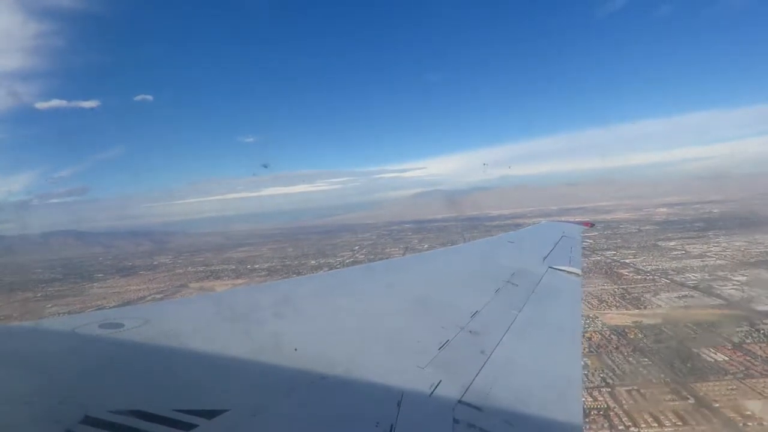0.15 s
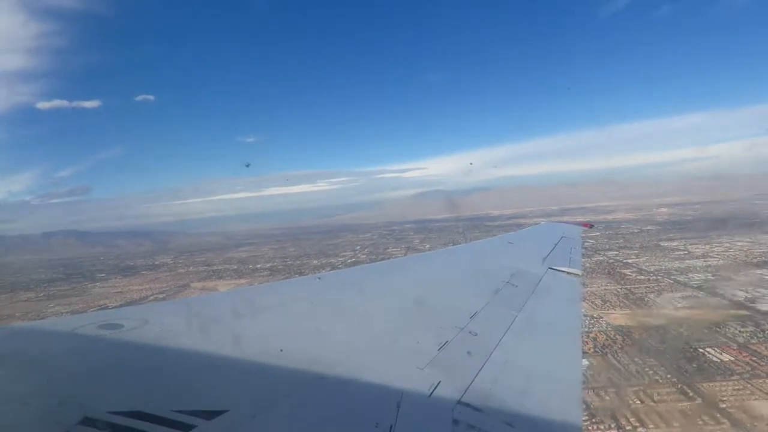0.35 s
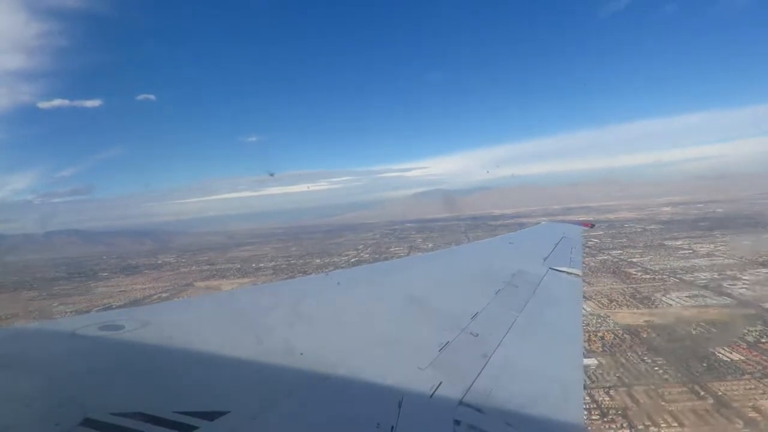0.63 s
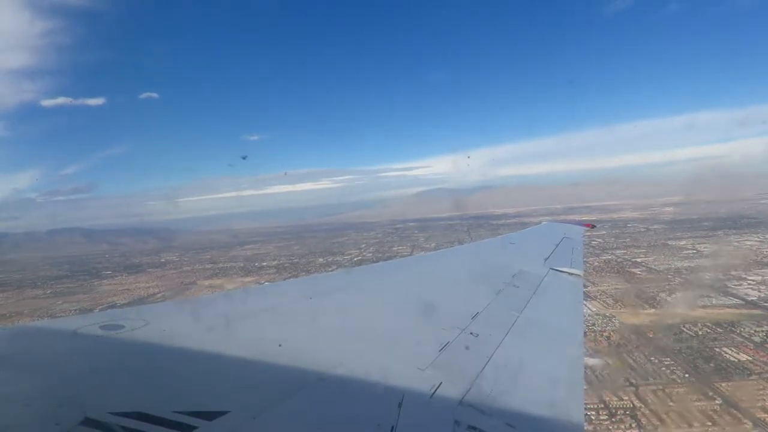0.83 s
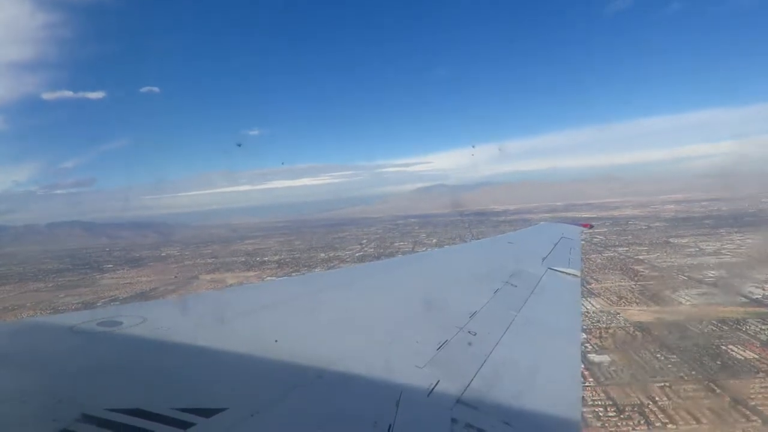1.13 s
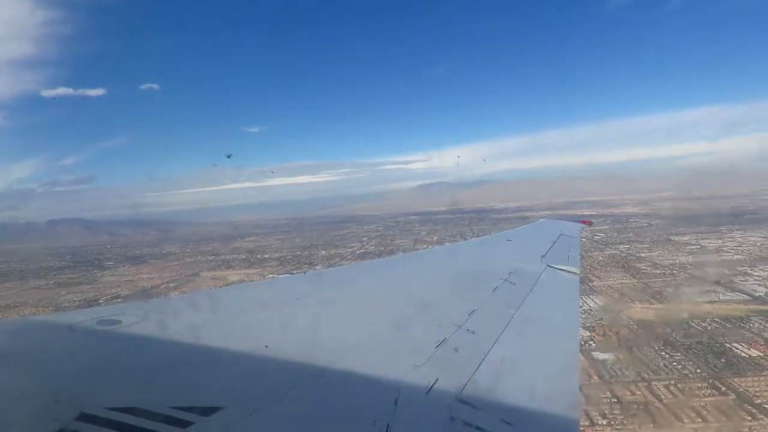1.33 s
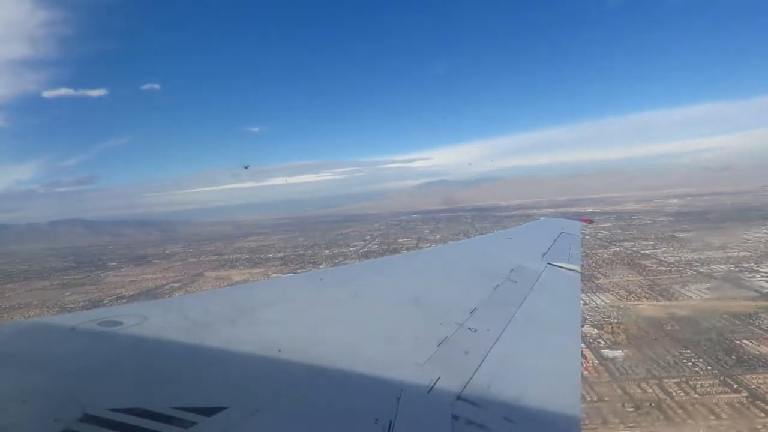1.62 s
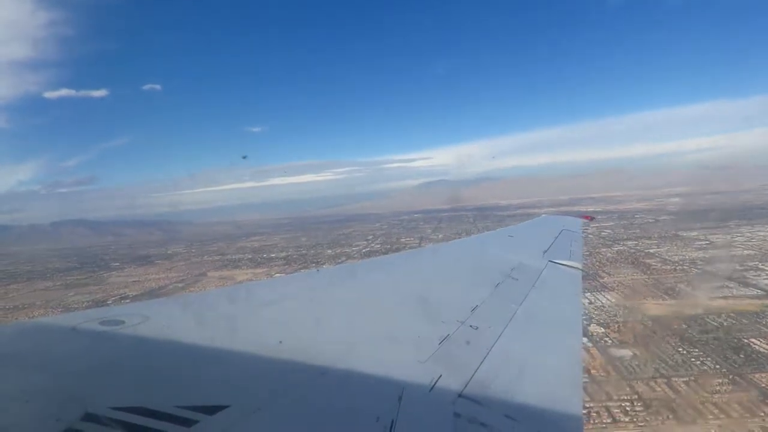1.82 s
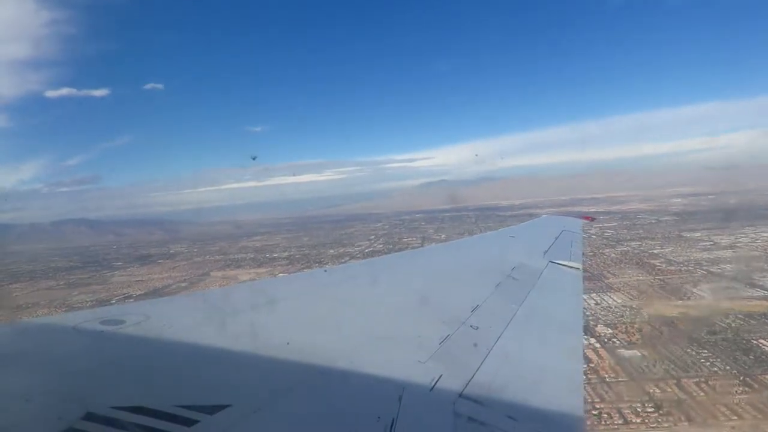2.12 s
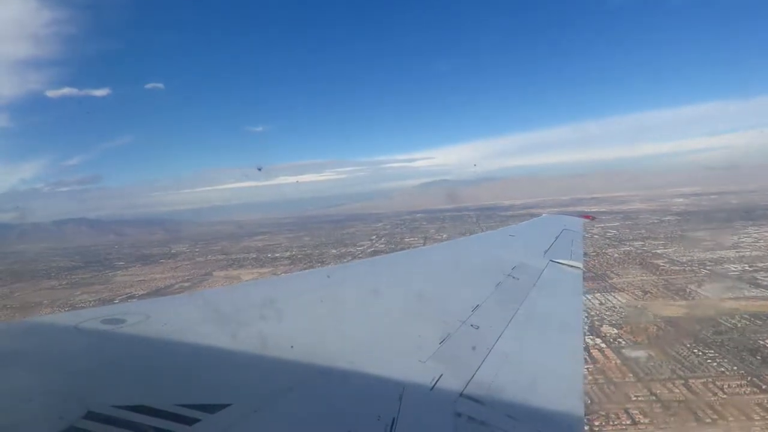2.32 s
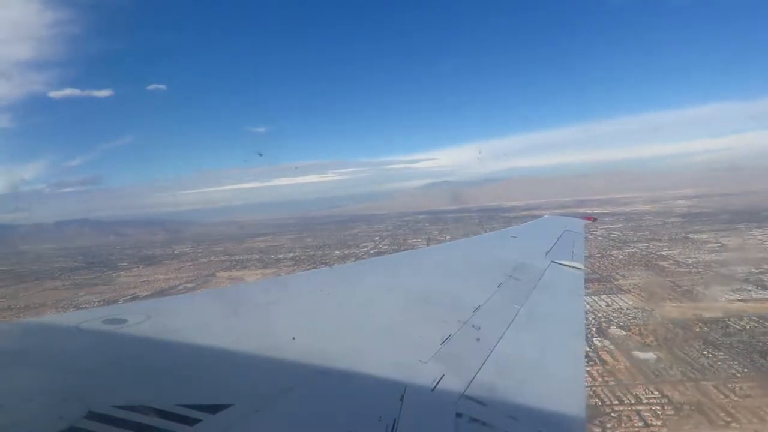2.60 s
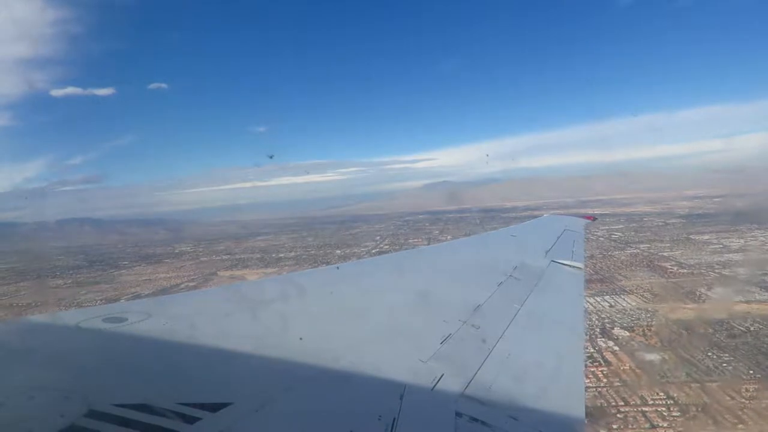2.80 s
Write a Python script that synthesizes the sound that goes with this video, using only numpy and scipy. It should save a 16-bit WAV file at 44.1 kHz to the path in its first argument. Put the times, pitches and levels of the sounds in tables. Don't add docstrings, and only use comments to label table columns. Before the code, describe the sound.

Airliner jet engine drone, deep and slowly beating, with steady low roar inside the cabin

```python
import sys
import numpy as np
from scipy import signal
from scipy.io import wavfile
from scipy.ndimage import uniform_filter1d

SR = 44100
rng = np.random.default_rng(int(sys.argv[2]) if len(sys.argv) > 2 else 0)


def voltage_ratio(decibels):
    exponent = np.asarray(decibels, float) / 20
    return 10 ** exponent


def generate_wav(signal):
    frames = np.transpose(np.atleast_2d(signal))
    scaled = np.clip(frames, -1, 1) * 32767
    pcm = np.round(scaled).astype(np.int16)
    wavfile.write(sys.argv[1], SR, pcm)


N = 130095

# (frequency [Hz], level [dB])
WIDTH = [(50, -28), (110, -32), (140, -22), (200, -20.5), (280, -20.5), (460, -11), (560, -15.5),
         (2500, -9), (3200, -13.5), (6000, -6), (14000, 2.5)]


def evened(x):
    return x / np.sqrt(np.mean(x ** 2) + 1e-20)


def read(points, hz):
    f, value = np.transpose(points)
    return np.interp(np.log(hz + 1), np.log(f + 1), value)


def slow(t, top_hz):
    f = np.geomspace(top_hz / 20, top_hz, 12)
    waves = np.sin(2 * np.pi * (f * t[:, None] + rng.random(len(f))))
    return evened((waves / np.sqrt(f)).sum(1))


def drift(top_hz):
    t = np.arange(0, N + 441, 441) / SR
    x = slow(t, top_hz)
    return np.interp(np.arange(N) / SR, t, x - x.mean())


def pair(mid, side):
    return np.array([mid + side, mid - side])


def tone(hz, turns, db):
    # (frequency [Hz], level [dB])
    tone_width = [(120, -33), (190, -27.5), (240, -25.5), (360, -22.5), (503, -24), (930, -15), (1800, -15),
                  (3500, -11.5)]
    phase = 2 * np.pi * turns
    side = voltage_ratio(read(tone_width, hz)) * np.cos(phase + 2 * np.pi * rng.random())
    return np.sqrt(2) * voltage_ratio(db) * pair(np.cos(phase), side)


def hiss():
    high = signal.butter(2, 7500, "high", fs=SR, output="sos")
    mid, side = signal.sosfilt(high, rng.standard_normal((2, N)))
    return voltage_ratio(-69) * pair(.25 * mid, side)


def rattles():
    rattle_s = (1.03, 1.084, 1.147, 1.149, 1.21, 1.872, 1.893, 2.165, 1.035, 2.11, 1.323, 1.15)
    # (peak level [dB], centre [Hz], length [s], band half-width / centre [1])
    trim = [(-44, 900, .02, .3), (-35, 750, .012, .3), (-36, 1800, .026, .4), (-43, 3200, .034, .15),
            (-43, 1900, .02, .35), (-41, 2950, .012, .12), (-56, 6200, .012, .15), (-50, 4070, .028, .04),
            (-54, 3000, .03, .06), (-44, 1900, .015, .25), (-36, 700, .01, .3), (-51, 5000, .02, .3)]
    # (time [s], peak level [dB], centre [Hz], length [s], band half-width / centre [1])
    bumps = [(0.291, -20.5, 171, 0.046, 0.23), (0.629, -23.5, 326, .05, .3), (0.821, -22.5, 105, .06, .3),
             (.9, -36.5, 674, 0.094, .12), (1.084, -22.5, 318, .07, 0.27), (1.092, -32, 695, .05, 0.127),
             (1.201, -31, 690, 0.077, 0.086), (1.663, -20, 85, 0.055, .3), (1.683, -35, 680, .12, 0.11),
             (1.738, -21, 327, .06, 0.27), (2.094, -21.5, 218, 0.1, .25), (2.617, -16, 262, .06, .35)]
    t, out = np.arange(N) / SR, np.zeros((2, N))
    events = [(s, *r) for s, r in zip(rattle_s, trim)]
    for start_s, db, hz, length_s, share in [*events, *bumps]:
        u = np.maximum(t - start_s, 0) / length_s
        envelope = np.minimum(8 * u, 1) * np.exp(-2 * u ** 2)
        band = signal.butter(4, [hz * (1 - share), hz * (1 + share)], "band", fs=SR, output="sos")
        mid, side = signal.sosfilt(band, rng.standard_normal((2, N)))
        out += voltage_ratio(db) * envelope * pair(mid, voltage_ratio(read(WIDTH, hz)) * side) / np.std(mid)
    return out


def pumps():
    pump_hz = (503.48, 878.8, 932.1, 1864.1, 2029.0, 704.0, 722.0)
    # (rms level [dB], pitch waver [Hz])
    pump_levels = [(-37, 0.48), (-53.5, 0.52), (-46, 5.17), (-67.5, 2.1), (-73, .3), (-51.5, 3.6),
                   (-44.5, 6.0)]
    flutter_db = 2.4
    out = np.zeros((2, N))
    for hz, (db, waver_hz) in zip(pump_hz, pump_levels):
        turns = np.cumsum(hz + waver_hz * drift(30)) / SR
        out += tone(hz, turns, db + flutter_db * drift(40))
    return out


def airflow(spectrum, db, size, patchy_db, swell_db, flicker_db):
    # (frequency [Hz], width [Hz], lift [dB])
    panels = [(50, 8.2, 5.5), (88.4, 9.3, 5), (128.7, 32, 4), (162, 13, 4), (350, 72, 4), (686, 38, 1),
              (1010, 160, 5), (542, 45, -3.5), (1920, 53, 4), (2710, 67, -9.5), (293, 13, 3.5),
              (4700, 600, -2.5), (3070, 600, 2), (5240, 1000, 5)]
    # (time [s], level [dB])
    gust = [(0, -2), (.12, -0.5), (.3, 1.5), (.57, 2.5), (.75, -2), (.95, 4), (1.15, 5), (1.3, -2.5),
            (1.45, -2.5), (1.68, 4.5), (1.84, -1), (2.0, 3.5), (2.15, 1), (2.27, -4.5), (2.45, 0),
            (2.62, 2), (2.76, 0), (2.95, 4)]
    # (time [s], level [dB])
    surge = [(0, 5), (.15, -1.1), (.3, 0.5), (.5, -2), (.65, 1.5), (.8, -1.5), (.95, -0.5), (1.1, -1),
             (1.27, 4.5), (1.42, -3.5), (1.6, -2), (1.75, 1.5), (1.95, -3), (2.15, 1.5), (2.3, -1),
             (2.5, -0.2), (2.65, 0), (2.9, 0.2)]
    # (frequency [Hz], level [dB])
    lean = [(60, 0.0), (130, 0.5), (290, -2.5), (640, 0), (1410, -1), (3100, 0.0), (6820, -1), (15000, 1.5)]
    gust_share_bass, gust_knee_hz, gust_top_hz, surge_top_hz = 0.056, 500, 5000, 600

    hop = size // 4
    frame_count, hz = N // hop + 6, np.fft.rfftfreq(size, 1 / SR)
    t = np.arange(frame_count) * hop / SR
    a, b, c, d, patches = rng.standard_normal((frame_count, len(hz), 5)).T
    patches = uniform_filter1d(patches, size=size // 100, axis=0)
    patches = evened(uniform_filter1d(patches, size=1 + 4000 // hop, axis=1))

    colour_db = read(spectrum, hz)
    for panel_hz, width_hz, lift_db in panels:
        colour_db = colour_db + lift_db / (1 + (2 * (hz - panel_hz) / width_hz) ** 2)

    gust_band = hz / (hz + gust_knee_hz) / (1 + hz / gust_top_hz)
    gust_share = gust_share_bass + (1 - gust_share_bass) * gust_band
    motion_db = np.interp(t, *np.transpose(gust)) + swell_db * slow(t, 40)
    motion_db = motion_db + flicker_db * rng.standard_normal(frame_count)
    surge_db = np.interp(t, *np.transpose(surge)) / (1 + (hz[:, None] / surge_top_hz) ** 2)
    field_db = patchy_db * patches + gust_share[:, None] * motion_db + surge_db

    side = (c + 1j * d) * voltage_ratio(read(WIDTH, hz))[:, None]
    z = np.array([a + 1j * b, side]) * voltage_ratio(colour_db[:, None] + field_db)
    z[1] += z[0] * np.tanh(read(lean, hz) * np.log(10) / 40)[:, None]
    mid, side = signal.istft(z, nperseg=size, noverlap=size - hop)[1][:, :N]
    return voltage_ratio(db) * pair(mid, side) / np.std(mid)


def rush():
    # (frequency [Hz], density [dB per Hz])
    rush_spectrum = [(700, -11.5), (1500, -4.5), (2600, -3), (5400, -12), (6000, -14.5), (6700, -18.5),
                     (13500, -28), (14200, -40.5)]
    return airflow(rush_spectrum, -47, size=512, patchy_db=1.0, swell_db=-2.0, flicker_db=2.5)


def roar():
    # (frequency [Hz], density [dB per Hz])
    roar_spectrum = [(12, -60.5), (20, -29.5), (128, 0.5), (193, -8), (363, -12.5), (557, -19.5),
                     (710, -21), (808, -27.5), (1700, -42), (2210, -77), (3740, -120)]
    return airflow(roar_spectrum, -15, size=4096, patchy_db=0.55, swell_db=0.9, flicker_db=1.3)


def engine(fan_hz, hum_db, orders, core_hz, core_db):
    in_step_s = (1.788, 1.574, 1.543, 1.727)
    wander_hz, hum_flutter_db, buzz_flutter_db = .05, 4, 2.4
    t = np.arange(N) / SR
    lead_turns = np.cumsum(wander_hz * drift(0.93)) / SR
    out = tone(core_hz, core_hz * (t - in_step_s[3]), core_db)
    for i, db in enumerate(hum_db):
        order = i + 1
        turns = order * fan_hz * (t - in_step_s[i])
        out += tone(order * fan_hz, turns, db + hum_flutter_db / order * drift(60))
    for order, db in orders:
        order = round(order)
        turns = order * (fan_hz * t + lead_turns) + rng.random()
        out += tone(order * fan_hz, turns, db + buzz_flutter_db * drift(30))
    return out


def engines():
    # (rms level [dB] of order 1, 2, 3)
    hums = [
        (-24, -28.5, -36),
        (-29.5, -27.5, -35),
    ]
    # (fan order [1], rms level [dB])
    near_orders = [(10, -59), (11, -55.5), (13, -70.5), (14, -70), (15, -61), (16, -67), (17, -64),
                   (18, -69), (25, -68.5), (26, -62.5), (27, -74), (28, -71), (29, -67.5), (30, -75.5),
                   (31, -74.5), (32, -76.5), (34, -71), (37, -74.5), (38, -70.5), (40, -75)]
    # (fan order [1], rms level [dB])
    extra_orders = [(12, -70), (20, -80.5), (33, -74.5), (39, -81.5), (49, -76)]
    # (fan order [1], rms level [dB])
    far_orders = [(5, -52.5), (13, -73), (15, -71), (16, -60.5), (17, -61.5), (19, -69.5), (34, -77.5)]
    near = engine(119.365, hums[0], [*near_orders, *extra_orders], core_hz=189.57, core_db=-32.5)
    far = engine(121.61, hums[1], far_orders, core_hz=191.59, core_db=-31.5)
    return near + far


def scene():
    return rattles() + pumps() + rush() + roar() + engines()


def roll_off(x):
    return signal.sosfilt(signal.butter(12, 15740, fs=SR, output="sos"), x)


def record(dry):
    low_cut = signal.butter(5, 36.5, "high", fs=SR, output="sos")
    cut = signal.sosfilt(low_cut, dry + hiss())
    limited = np.tanh(cut / 1.429) * 1.373
    return roll_off(limited)


dry = scene()
out = record(dry)
generate_wav(out)
```